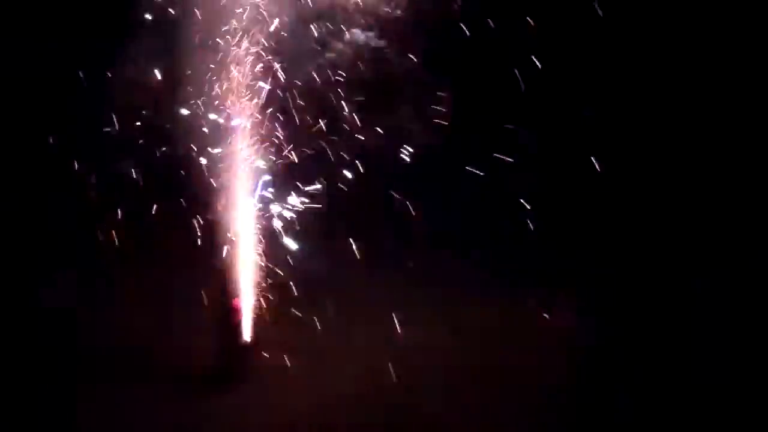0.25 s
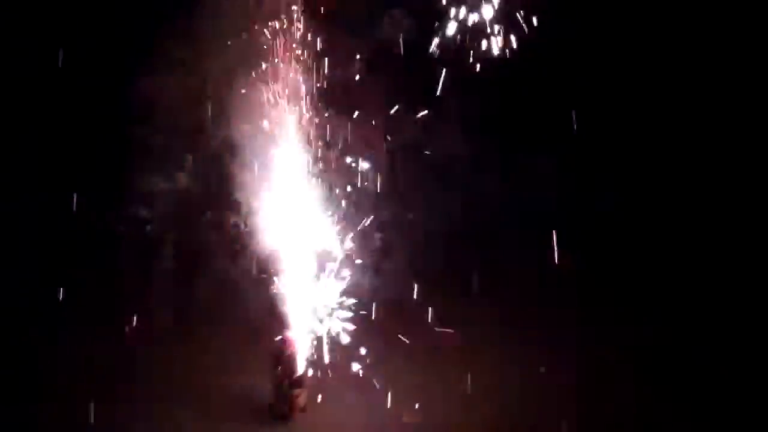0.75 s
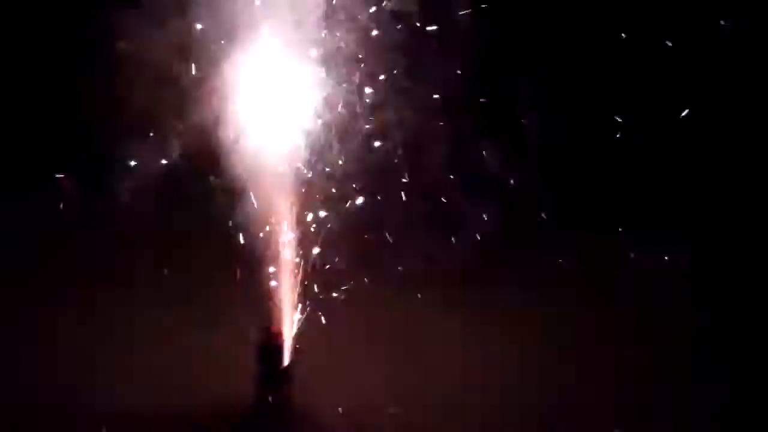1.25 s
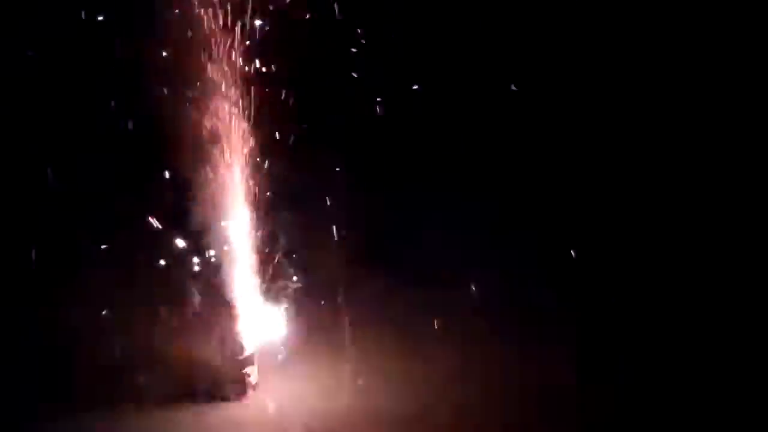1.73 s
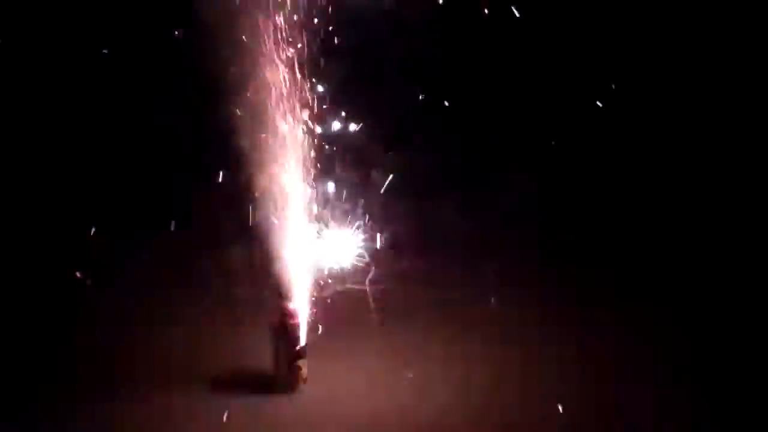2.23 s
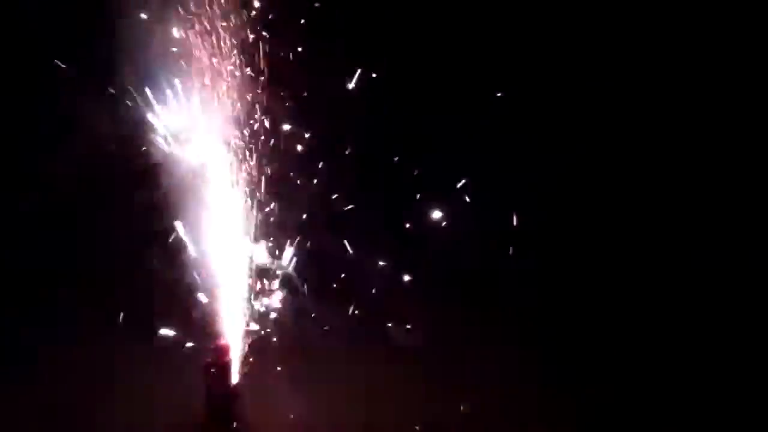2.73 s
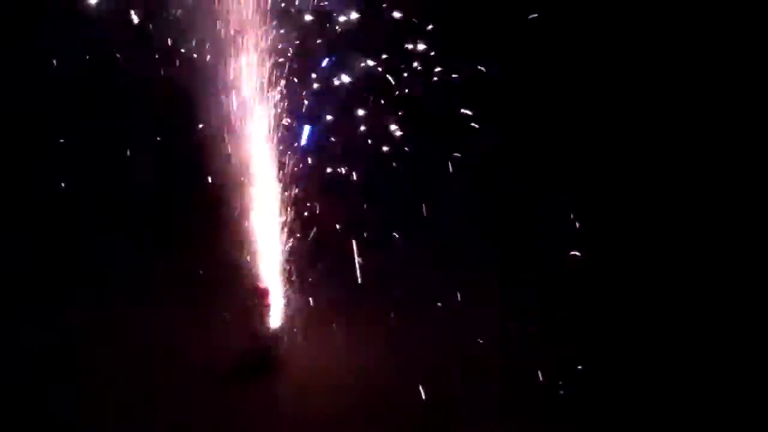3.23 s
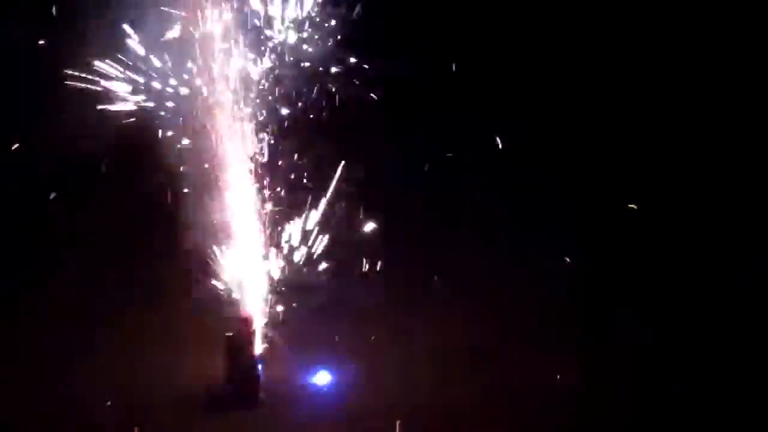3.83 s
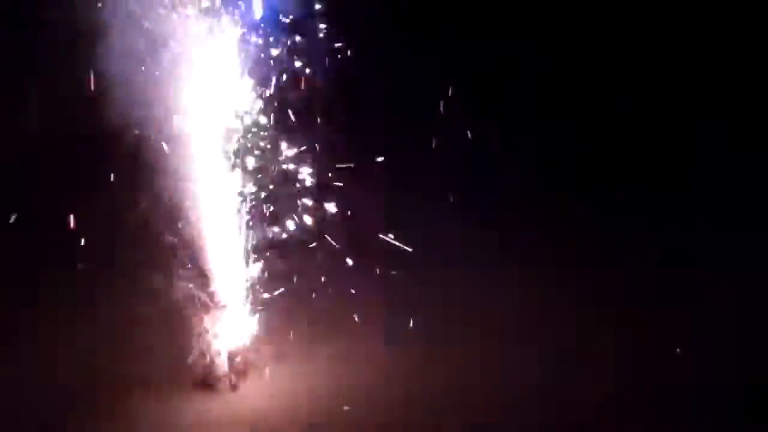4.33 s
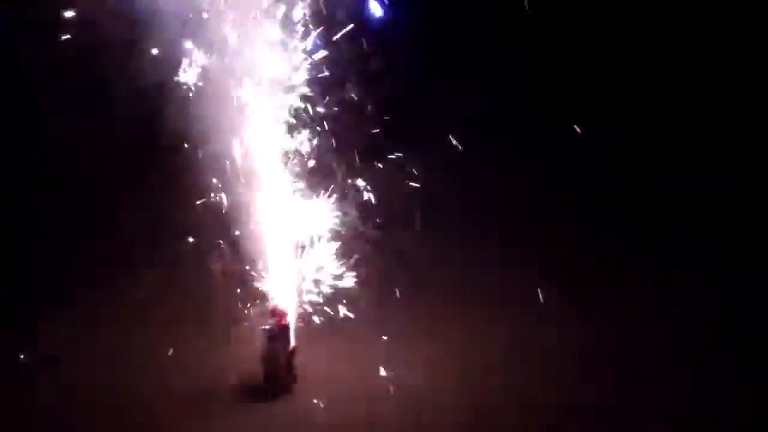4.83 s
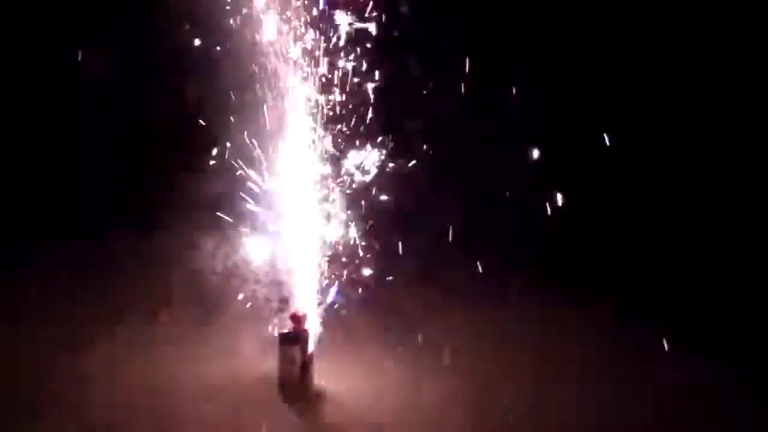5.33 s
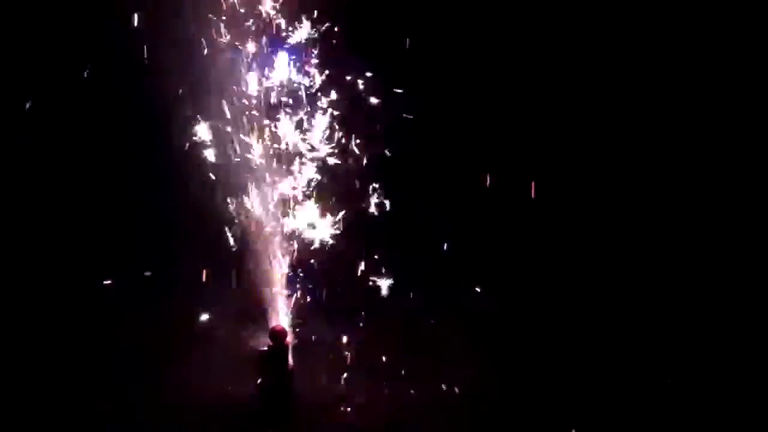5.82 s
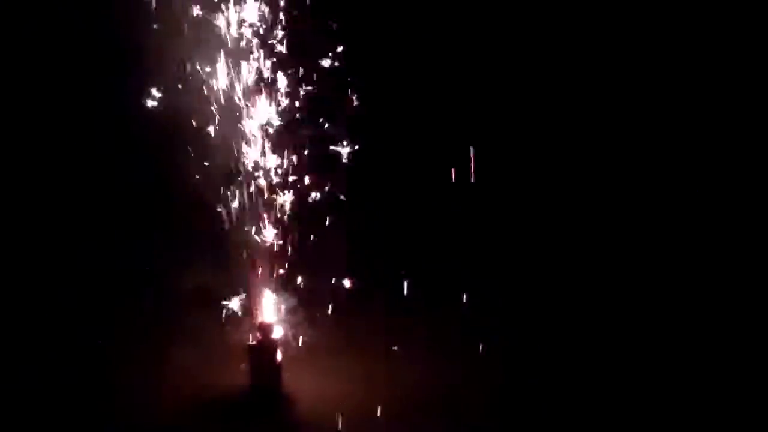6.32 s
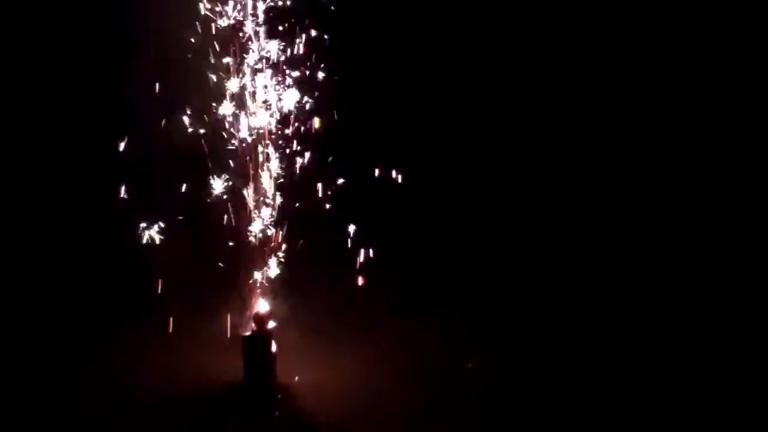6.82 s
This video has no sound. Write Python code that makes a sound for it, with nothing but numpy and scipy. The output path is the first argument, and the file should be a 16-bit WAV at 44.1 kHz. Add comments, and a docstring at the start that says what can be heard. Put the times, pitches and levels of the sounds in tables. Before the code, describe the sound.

A ground firework fountain hisses harshly on night pavement, spitting crackling sparks with occasional soft thumps, then swelling to a louder hollow roar.

```python
"""A harsh hiss of gas is heard first, with fizzing sparks that spit in short bursts: a ground fountain firework.
It burns on pavement outdoors at night, a few metres away; now and then there is a soft thump.
Near the end the last charge brings fewer sparks and a louder, hollow roar from the emptied tube.
Filtered noise makes the hiss, random cracks make the sparks and rumble, and double clicks make the thumps.
A whistle, a few pops and a faint drone lie beneath; two close microphone openings give left and right."""
import sys
import numpy as np
from scipy import signal
from scipy.fft import rfft, irfft
from scipy.io import wavfile
from scipy.ndimage import uniform_filter1d

SR = 44100
rng = np.random.default_rng(int(sys.argv[2]) if len(sys.argv) > 2 else 0)


def store_pcm(level_fs):
    """Save levels as 16-bit WAV."""
    pcm = np.round(np.clip(level_fs, -1, 1) * 32767).astype(np.int16)
    wavfile.write(sys.argv[1], SR, np.atleast_2d(pcm).T)


N = 311787
TIME = np.arange(N) / SR  # seconds
HZ = np.fft.rfftfreq(N, 1 / SR)

# Which charge burns (0 first, 1 second, 2 last; fractions are a mix): time_s, charge
CHARGE_STAGES = [(0, 0), (3.05, -0.01), (3.45, 0.66), (4.3, 1.04), (5.35, 1.04), (5.6, 1.5), (5.95, 1.92),
                 (6.4, 1.79), (7.07, 2.5)]
# Steady strength of the gas jet, before surges and layer trims: time_s, level_db
STEADY_THRUST = [(0, -29), (.33, -30.5), (.5, -25.5), (.67, -27), (.93, -31), (1.25, -34), (2.3, -31.5),
                 (2.9, -28.5), (3.2, -31), (4.15, -30), (4.45, -31.5), (5.0, -29.5), (5.25, -27),
                 (5.5, -28.5), (5.79, -28.5), (5.99, -21), (6.45, -20.5), (7.07, -22.5)]
# Surges of gas that build up and then give way: top_s, rise_db, build_s
GAS_SURGES = [(.02, 3, .04), (.24, 3, 0.02), (.6, 3.5, 0.078), (1.1, 1.5, .07), (1.535, 3, 0.074),
              (1.77, 2.3, 0.1), (1.995, 3.5, 0.043), (2.2, 4.5, 0.043), (2.8, 1.5, 0.11),
              (3.08, 2.5, 0.037), (3.33, 3, 0.076), (3.48, 3, 0.065), (3.72, 4, 0.13), (4.69, 2, 0.094),
              (5.4, 3, 0.02), (5.715, 3, 0.037)]
SURGE_FALL = 0.58  # time a swell takes to die, as a share of its build-up
# Broad colour of the jet for each charge, before levelling: pitch_hz, relative_db
FIRST_JET_COLOUR = [(500, -10.5), (1000, -8.5), (1600, -6.5), (3000, 2.5), (6000, 3), (10000, -1),
                    (14000, 0)]
SECOND_JET_COLOUR = [(500, -27), (1000, -6), (1600, -3), (3000, 3), (6000, -3), (10000, -2), (14000, -1.5)]
LAST_JET_COLOUR = [(500, -3), (1000, -5), (1600, 2.5), (3000, -7.5), (6000, -7), (10000, -11.5),
                   (14000, -12.5)]
# Resonances (and a few dips) of the tube for each charge: pitch_hz, half_width_hz, boost_db
FIRST_TUBE_RINGS = [(810, 60, 6.5), (1180, 100, -4), (2070, 457, 10.5), (2296, 43, 5), (2680, 46, 4),
                    (3990, 130, 2), (4534, 400, 8), (7250, 530, 4.5), (9700, 200, 3)]
SECOND_TUBE_RINGS = [(1070, 99, 7), (1553, 144, 9), (1980, 200, 4.5), (2085, 97, 5.5), (2540, 130, 3.5),
                     (3700, 110, 2.5), (3830, 59, -2), (4650, 390, 9.5), (6360, 410, 9.5)]
LAST_TUBE_RINGS = [(603, 63, 9.3), (1082, 50, 11), (1470, 85, 8.3), (1940, 208, 12.7), (3397, 550, 16.9),
                   (5030, 400, 10.9), (6570, 360, 7.1), (8280, 500, 5.6)]
# A narrow dip in the hiss sinks as the first charge burns down; DIP_HZ is where it starts
DIP_HZ, DIP_SINK_HZ_PER_S, DIP_WIDTH_HZ, DIP_DB = 3700, 250, 180, -4

# Flow of small sparks, before surges and the layer trim: time_s, level_db
SMALL_SPARK_FLOW = [(0, -34), (.23, -48), (.43, -59), (.65, -27.5), (1.04, -33.5), (1.3, -39),
                    (1.95, -32.5), (2.9, -30.5), (3.5, -33.5), (4.05, -26.5), (4.5, -33), (5.3, -30.5),
                    (5.7, -44), (6.1, -33), (7.07, -39)]
# Colour of the small sparks, before levelling: pitch_hz, relative_db (per Hz)
FIZZ_COLOUR = [(100, -22), (300, -6), (1000, -28), (3000, -6), (7000, 0.5), (8300, -4.5), (9400, -1.5),
               (10500, -3.5), (12700, -0.5), (13900, 5), (15000, -39)]
# The biggest sparks bursting in short spits: middle_s, level_db, length_s
BIG_BURSTS = [(.025, -37, 0.0058), (.24, -27.5, 0.007), (.316, -28.5, .0075), (.385, -27.5, .0054),
              (.615, -24.5, .005), (.722, -32, 0.0045), (1.125, -28, .016), (1.197, -30, 0.0063),
              (1.227, -32, 0.0081), (1.314, -25, 0.0055), (1.38, -26.5, 0.0035), (1.388, -30, .005),
              (1.535, -28.5, 0.014), (1.614, -26.5, 0.0055), (1.913, -28.5, 0.011), (2.002, -26, 0.0095),
              (2.111, -29.5, .007), (2.213, -27.5, 0.0081), (2.34, -28, 0.0056), (2.396, -27, .006),
              (2.414, -26, 0.0056), (2.505, -28, .006), (2.552, -26.5, .006), (2.619, -24.5, 0.0081),
              (3.068, -31, 0.009), (3.122, -27, .009), (3.336, -24, .004), (3.36, -27, .006),
              (3.514, -28, 0.0091), (4.359, -31, 0.0076), (4.528, -30, .007), (4.688, -27, .012),
              (4.826, -25.5, 0.011), (4.934, -29, .009), (5.078, -29, .009), (5.232, -25.5, .007),
              (5.41, -26, .007), (5.625, -30, 0.0077), (5.74, -27.5, 0.0064)]
# Single sharp snaps of near sparks: middle_s, level_db
NEAR_SNAPS = [(.3859, -17), (1.3091, -21), (1.3144, -18), (2.0206, -16.5), (2.3374, -19), (4.2972, -20),
              (5.623, -18)]
SNAP_S = 0.0003
# Lesser spits come by chance until the last charge takes over; level and length are middle values
SPITS_PER_S, SPIT_DB, SPIT_SPREAD_DB, SPIT_S = 13, -32.5, 3.5, 0.005
# Colour of the bursting sparks, before levelling: pitch_hz, relative_db (per Hz)
SPIT_COLOUR = [(60, -20), (250, -8), (1000, -1.5), (3000, 0), (7000, 1), (10500, 2), (12700, 6),
               (13900, 11), (15000, -35)]
# A few sparks burst with a hollow pop: middle_s, level_db, length_s
HOLLOW_POPS = [(.246, -41, .008), (0.314, -45, 0.0049), (0.613, -42, 0.0058), (1.384, -40, 0.0068)]
POP_HZ, POP_WIDTH_HZ = 925, 170

# Soft low thumps, each a double push: start_s, peak_db, second_push_after_s
DOUBLE_THUMPS = [(.7635, -27, .005), (1.3345, -20.5, 0.0073), (1.38, -26, 0.0087), (2.1955, -20.5, 0.0076),
                 (2.3585, -23, .008), (2.907, -24.5, 0.0065), (3.234, -31, 0.0041), (3.9645, -23, 0.0069),
                 (3.9947, -24, 0.0066), (5.426, -25.5, .008), (5.449, -25.5, 0.0083)]
# Colour of the thumps, before levelling: pitch_hz, relative_db (per Hz)
THUMP_COLOUR = [(25, -32), (70, -6), (130, 6), (260, 6), (400, -3), (620, 1.5), (1000, -19), (3000, -52)]
# A brief faint rising whistle: time_s, pitch_hz, level_db
WHISTLE_SLIDE = [(6.325, 620, -48), (6.35, 737, -36), (6.38, 845, -38), (6.41, 1020, -38),
                 (6.43, 1100, -34)]

# Plume rumble for the first, second and last charge, before the layer trim, with the jet at usual strength
PLUME_CHARGE_DB, USUAL_THRUST_DB = [-45.5, -43, -38], -30
# The plume billows as the second charge catches: top_s, rise_db, build_s
PLUME_BILLOWS = [(3.38, 3.7, 0.2)]
# Colour of the plume, before levelling: pitch_hz, relative_db (per Hz)
RUMBLE_COLOUR = [(20, -35), (35, -41), (60, -18), (100, -7), (160, 0), (250, 3), (380, -4), (580, 1),
                 (800, -7.5), (1100, -10), (1600, -7.5), (4000, -19)]
# A faint low drone that swells with the plume; HUM_DB is its level at the plume's median
HUM_HZ, HUM_WIDTH_HZ, HUM_DB = 124.8, 4.4, -57.5

# Likeness of the two microphone openings: pitch_hz, likeness (0 to 1)
LEFT_RIGHT_LIKENESS = [(60, .98), (300, .995), (1100, .97), (1350, .9), (1800, .96), (2150, .86),
                       (2500, .98), (3200, .97), (4100, .84), (5000, .87), (5400, .98), (6000, .92),
                       (6800, .92), (7700, .76), (14000, .74)]
# Left level minus right level: pitch_hz, difference_db
LEFT_RIGHT_BALANCE = [(100, 1.5), (800, 2.5), (1150, .6), (1430, 5), (1800, 0.1), (2200, 4.3), (2500, -0.2),
                      (3400, 2), (4400, 3.5), (5000, 3), (5400, 0.2), (7200, 0.5), (10200, 2), (14000, 6.5)]
# How far left runs ahead of right: pitch_hz, lead_radians
LEFT_LEAD = [(100, 0.17), (900, 0.031), (1300, 0.27), (1700, .03), (2100, .28), (2500, 0), (3600, 0.28),
             (4200, 0), (5400, 0.23), (6800, 0), (7700, .88), (11500, 1.2)]
# Bands (Hz) in which the spark and plume levels are set
SPARK_BAND, LOW_BAND = (8000, 14400), (130, 1200)
EDGE_HZ = 14300  # upper limit of the recorder


def jet(thrust_db, trim_db=-1, flutter_db=0.67, flutter_hz=60, patchy_db=1.22):
    """Rushing, turbulent gas rings the tube; its colour slides from one charge to the next."""
    hz, t, noise = signal.stft(rng.standard_normal((2, N)), SR, nperseg=512, noverlap=384)
    charge, = follow(CHARGE_STAGES, t)
    stages = [(FIRST_JET_COLOUR, FIRST_TUBE_RINGS),
              (SECOND_JET_COLOUR, SECOND_TUBE_RINGS),
              (LAST_JET_COLOUR, LAST_TUBE_RINGS)]
    field_db = 0
    for k, (colour, tube) in enumerate(stages):
        rings_db = sum(db * np.exp(-.5 * ((hz - f) / width) ** 2) for f, width, db in tube)
        shape_db = read(colour, hz) + rings_db
        share = np.maximum(1 - abs(np.clip(charge, 0, 2) - k), 0)
        field_db = field_db + shape_db[:, None] * share
    dip_hz = DIP_HZ - DIP_SINK_HZ_PER_S * t
    dip = np.exp(-.5 * ((hz[:, None] - dip_hz) / DIP_WIDTH_HZ) ** 2)
    field_db = field_db + DIP_DB * dip * np.clip(1 - charge, 0, 1)
    # eddies brighten and dull narrow bands for a few hundredths of a second
    patches = uniform_filter1d(rng.standard_normal(field_db.shape), size=7, axis=0)
    patches = evened(uniform_filter1d(patches, size=12, axis=1))
    # the narrow nozzle gives off little bass
    bass_cut = hz ** 2 / (hz ** 2 + 300 ** 2)
    gain = gain_of(field_db + patchy_db * patches) * bass_cut[:, None]
    # level every moment by its middle band, so only the thrust sets the loudness there
    inside = (hz > 1600) & (hz < 5200)
    gain /= np.sqrt(np.mean(gain ** 2 * inside[:, None], axis=0))
    gas = signal.istft(noise * gain, SR, nperseg=512, noverlap=384)[1][:, :N]
    return gas * gain_of(thrust_db + trim_db + flutter_db * drift(flutter_hz))


def thrust():
    """Level of the gas jet in dB: the steady burn and its surges."""
    return follow(STEADY_THRUST, TIME)[0] + swells(GAS_SURGES)


def swells(rows):
    """Rise in dB over time from swells that build up and give way more quickly."""
    rise_db = np.zeros(N)
    for s, db, build_s in rows:
        width_s = np.where(TIME < s, build_s, build_s * SURGE_FALL)
        rise_db += db * np.exp(-((TIME - s) / width_s) ** 2)
    return rise_db


def fizz(thrust_db, trim_db=-1.5, clump_db=1.46, clump_hz=90):
    """Thousands of burning metal grains a second, thrown out in clumps; each surge of gas carries more."""
    grains = coloured(crackle(per_s=14000, spread_db=1.5), FIZZ_COLOUR, SPARK_BAND)
    # a surge is how far the thrust stands above its own average over a third of a second
    surge_db = thrust_db - uniform_filter1d(thrust_db, size=SR // 3)
    flow_db = follow(SMALL_SPARK_FLOW, TIME)[0] + trim_db
    return grains * gain_of(flow_db + surge_db + clump_db * drift(clump_hz))


def bursts(power, ragged_db=1.6, ragged_hz=400):
    """Larger sparks fly apart, each in a quick ragged volley of cracks."""
    volley = crackle(per_s=24000, spread_db=1.0) * gain_of(ragged_db * drift(ragged_hz))
    return coloured(evened(volley) * np.sqrt(power), SPIT_COLOUR, SPARK_BAND)


def burst_power(rise=0.65):
    """Power of the bursting sparks over time; each flares sharply and dies a little more slowly."""
    snaps = [(s, db, SNAP_S) for s, db in NEAR_SNAPS]
    power = np.zeros(N)
    for s, db, length in [*BIG_BURSTS, *snaps, *lesser_spits()]:
        near = slice(max(int((s - 2 * length) * SR), 0), int((s + 2 * length) * SR))
        age = (TIME[near] - s) / length
        fade = np.where(age < 0, (age / rise) ** 4, age ** 2)
        power[near] += gain_of(db) ** 2 * np.exp(-fade)
    return power


def lesser_spits(count=200):
    """Small bursts at uneven intervals, none from the last charge; columns middle_s, level_db, length_s."""
    wait, size, length, chance = rng.random((count, 4)).T
    s = np.cumsum(.5 + wait) / SPITS_PER_S
    level_db = SPIT_DB + SPIT_SPREAD_DB * (2 * size - 1)
    rows = np.transpose([s, level_db, SPIT_S * (.5 + length)])
    # they thin out as the second charge gives way to the last
    burning = follow(CHARGE_STAGES, s)[0] < 1 + chance / 2
    return rows[(s < TIME[-1]) & burning]


def sputter(power, thrust_db, depth=0.54, recover_s=0.013):
    """The stream sags for a moment after each burst, most of all when it is thin."""
    keep = np.exp(-1 / (recover_s * SR))
    recent = signal.lfilter([(1 - keep) ** 2], [1, -2 * keep, keep ** 2], power)
    return 1 / np.sqrt(1 + depth * recent / gain_of(thrust_db) ** 2)


def thumps(second=0.51, tail_s=.012, tail_db=-26):
    """Two dull pushes of air in quick succession, and a short scattered tail."""
    t = TIME[:SR // 8]
    out = np.zeros(N)
    for s, db, gap_s in DOUBLE_THUMPS:
        push = gain_of(tail_db) * np.exp(-t / tail_s) * rng.standard_normal(len(t))
        push[0] += 1
        push[int(gap_s * SR)] += second
        out[int(s * SR):][:len(t)] += gain_of(db) * push
    dull = gain_of(read(THUMP_COLOUR, HZ))
    # divide by the height of the plain filtered click to set the level
    return irfft(rfft(out) * causal(dull), N) / irfft(dull, N)[0]


def pops():
    """Short hollow rings of trapped gas, made from noise around one pitch."""
    resonance = 1 / (1 + ((HZ - POP_HZ) / POP_WIDTH_HZ) ** 2)
    ring = evened(irfft(rfft(rng.standard_normal(N)) * resonance, N))
    return ring * sum(gain_of(db) * np.exp(-((TIME - s) / length) ** 4) for s, db, length in HOLLOW_POPS)


def whistle():
    """A thin sine tone slides upward inside the roar."""
    hz, db = follow(WHISTLE_SLIDE, TIME)
    sounding = (TIME > WHISTLE_SLIDE[0][0]) & (TIME < WHISTLE_SLIDE[-1][0])
    soft_edges = uniform_filter1d(1. * sounding, size=400)
    tone = np.sqrt(2) * np.sin(2 * np.pi * np.cumsum(hz) / SR)
    return gain_of(db) * soft_edges * tone


def plume(plume_db, trim_db=-1.5, lumpy_db=0.5, lumpy_hz=35):
    """The rising column of hot gas flutters and rumbles."""
    roar = coloured(crackle(per_s=2500, spread_db=2.5), RUMBLE_COLOUR, LOW_BAND)
    return roar * gain_of(plume_db + trim_db + lumpy_db * drift(lumpy_hz))


def plume_level(thrust_db, coupling=0.36):
    """Plume level in dB: each charge rumbles more than the one before, and a stronger jet adds to it."""
    charge_db = np.interp(follow(CHARGE_STAGES, TIME)[0], np.arange(3), PLUME_CHARGE_DB)
    return charge_db + coupling * (thrust_db - USUAL_THRUST_DB) + swells(PLUME_BILLOWS)


def hum(plume_db, swell=0.7):
    """A narrow, wavering low drone that grows as the plume does."""
    line = 1 / (1 + ((HZ - HUM_HZ) / HUM_WIDTH_HZ) ** 2)
    level_db = HUM_DB + swell * (plume_db - np.median(plume_db))
    return gain_of(level_db) * evened(irfft(rfft(rng.standard_normal(N)) * line, N))


def crackle(per_s, spread_db):
    """Two streams of tiny cracks that share their moments; most are small, a few large."""
    size = gain_of(spread_db * np.minimum(rng.exponential(1, N), 4))
    moments = rng.random(N) < per_s / SR
    return evened(size * moments * rng.standard_normal((2, N)))


def drift(rate_hz):
    """Slow random wandering with an rms of one."""
    return evened(irfft(rfft(rng.standard_normal(N)) / (1 + (HZ / rate_hz) ** 4), N))


def coloured(x, colour, band):
    """Filters white sound so that the given band keeps the level of the input."""
    gain = gain_of(read(colour, HZ))
    inside = (HZ > band[0]) & (HZ < band[1])
    return irfft(rfft(x) * gain / np.sqrt(np.mean(gain ** 2 * inside)), N)


def causal(gain):
    """Spectrum with the given gains whose ring follows the blow (minimum phase)."""
    cepstrum = irfft(np.log(gain), N)
    cepstrum[1:] *= 2 * (np.arange(1, N) < N / 2)
    return np.exp(rfft(cepstrum))


def gain_of(db):
    """Decibels to amplitude."""
    return 10 ** (np.asarray(db) / 20)


def evened(x):
    """Scales to an rms of one."""
    return x / np.sqrt(np.mean(x ** 2) + 1e-20)


def read(points, hz):
    """Reads a table at any pitch, on a log-frequency axis."""
    f, value = np.transpose(points)
    return np.interp(np.log(hz + 1), np.log(f), value)


def follow(rows, t):
    """Each column of a table over time, read at the times t."""
    s, *columns = np.transpose(rows)
    return [np.interp(t, s, c) for c in columns]


def ports(pair):
    """Two close openings hear the bass much alike; in the treble the left is mostly louder and leads."""
    a, b = rfft(pair)
    same = np.clip(read(LEFT_RIGHT_LIKENESS, HZ), 0, 1)
    tilt = gain_of(read(LEFT_RIGHT_BALANCE, HZ) / 2)  # half the difference on each side
    lead = read(LEFT_LEAD, HZ)
    left = a * tilt
    right = (same * a + np.sqrt(1 - same ** 2) * b) * np.exp(-1j * lead) / tilt
    # keep the level of the two sides averaged together
    middle = np.sqrt(tilt ** 2 + tilt ** -2 + 2 * same * np.cos(lead)) / 2
    return irfft(np.array([left, right]) / middle, N)


def scene():
    """Jet, sparks and plume follow the thrust; the small low sounds join the part both sides share."""
    thrust_db, power = thrust(), burst_power()
    plume_db = plume_level(thrust_db)
    stream = (jet(thrust_db) + fizz(thrust_db)) * sputter(power, thrust_db)
    pair = stream + bursts(power) + plume(plume_db)
    pair[0] += thumps() + pops() + whistle() + hum(plume_db)
    return ports(pair)


def record(dry):
    """The recorder's band limit: a steep low-pass filter."""
    low_pass = signal.firwin(601, EDGE_HZ, window=("kaiser", 9), fs=SR)
    return signal.oaconvolve(dry, low_pass[None], "same")


dry = scene()
out = record(dry)
store_pcm(out)
```